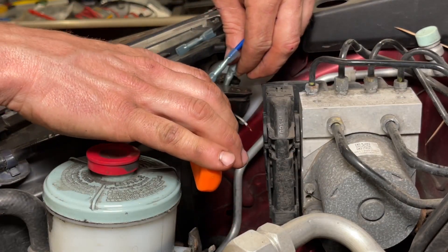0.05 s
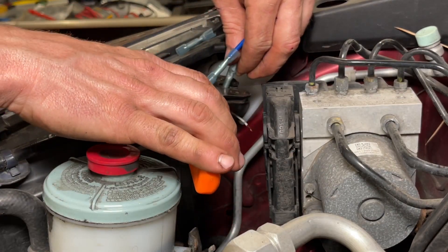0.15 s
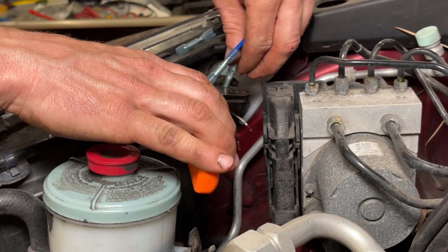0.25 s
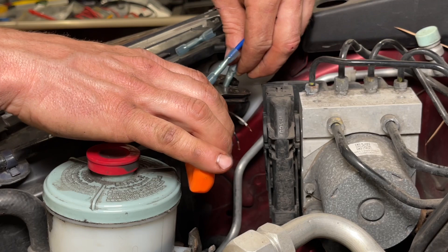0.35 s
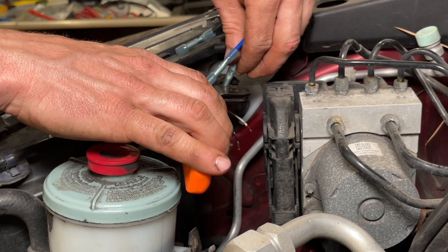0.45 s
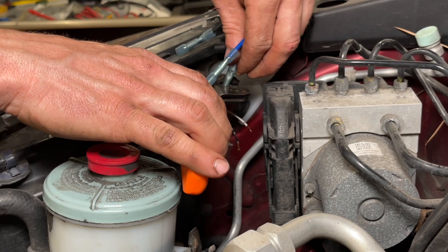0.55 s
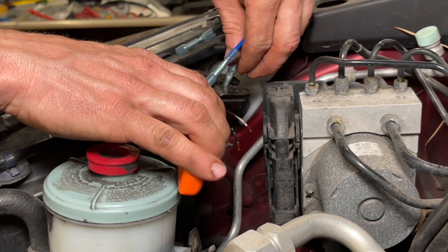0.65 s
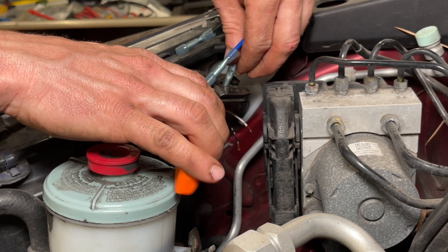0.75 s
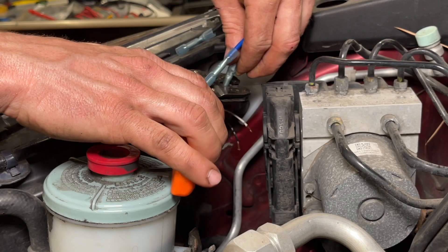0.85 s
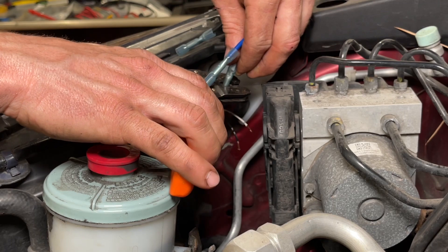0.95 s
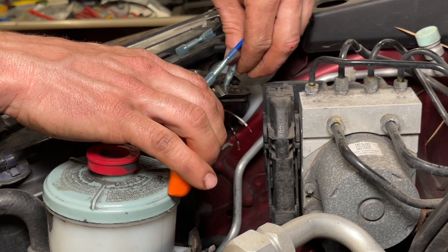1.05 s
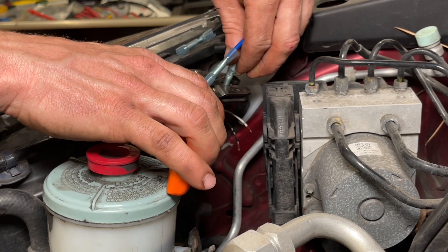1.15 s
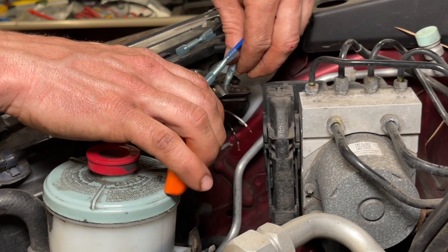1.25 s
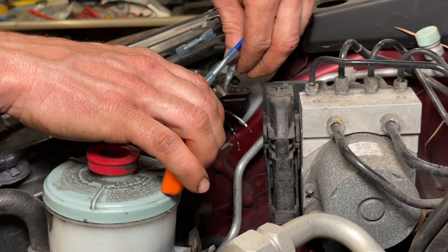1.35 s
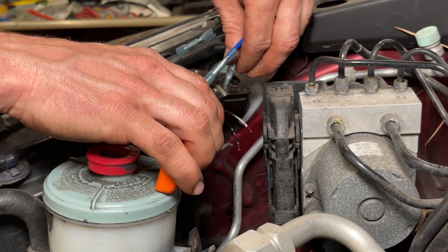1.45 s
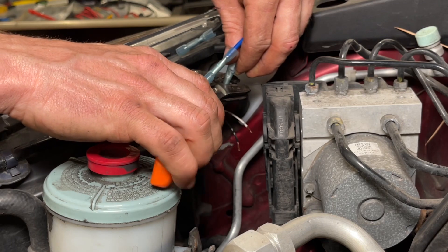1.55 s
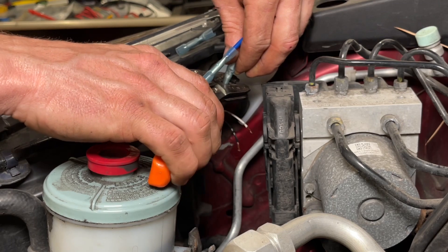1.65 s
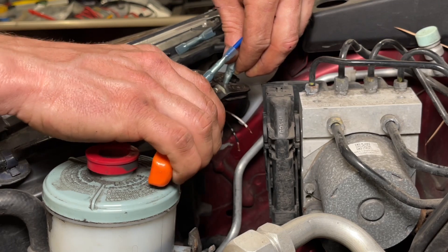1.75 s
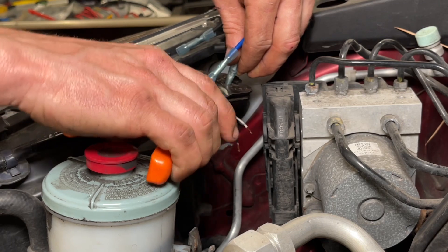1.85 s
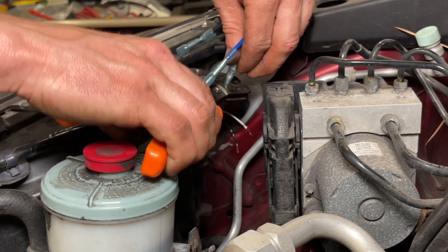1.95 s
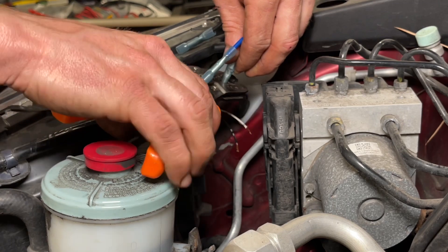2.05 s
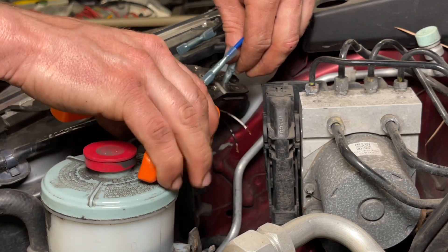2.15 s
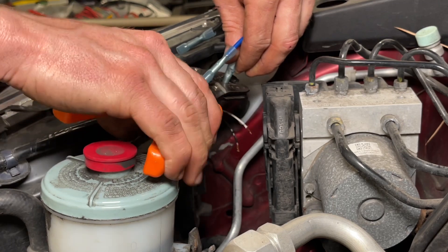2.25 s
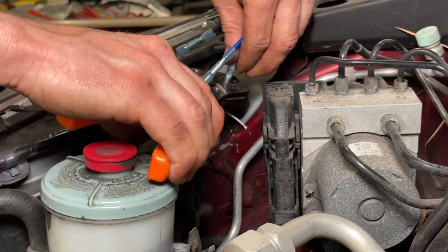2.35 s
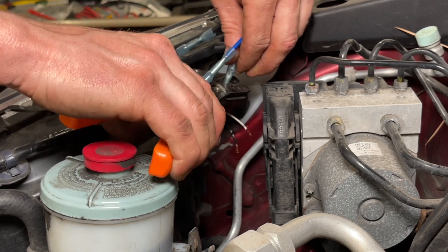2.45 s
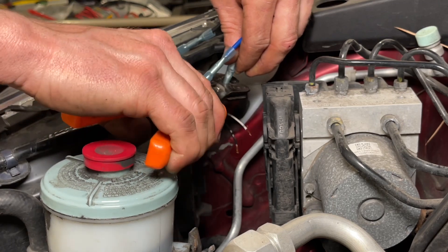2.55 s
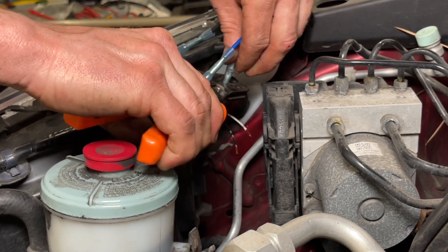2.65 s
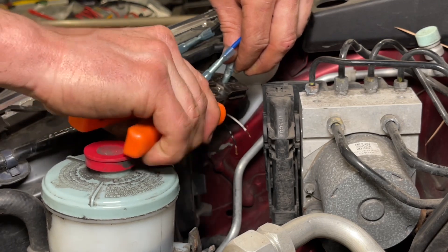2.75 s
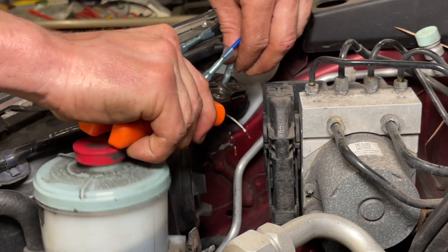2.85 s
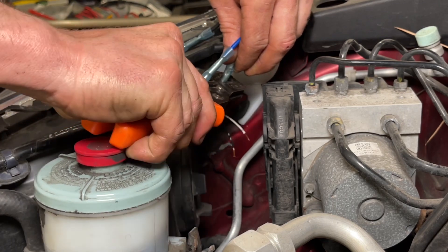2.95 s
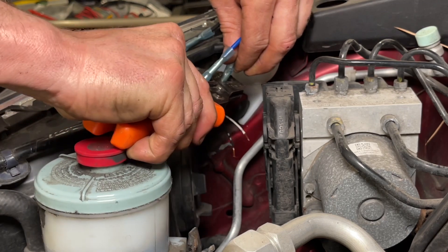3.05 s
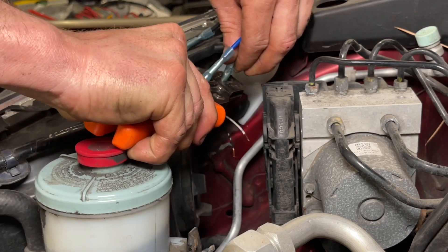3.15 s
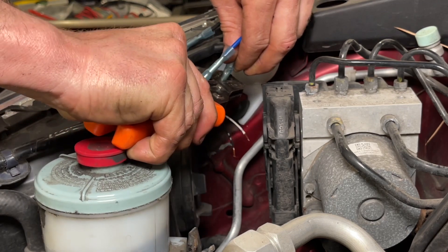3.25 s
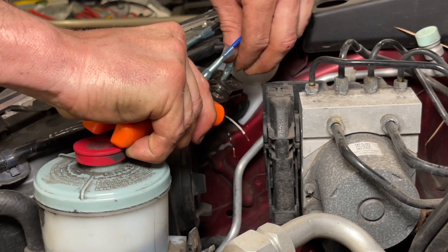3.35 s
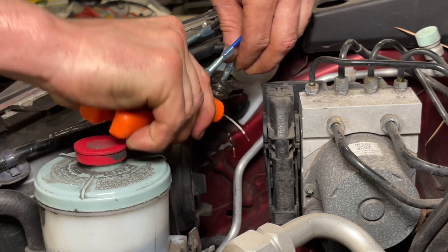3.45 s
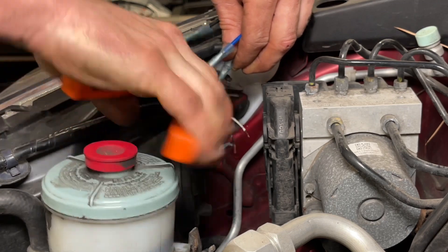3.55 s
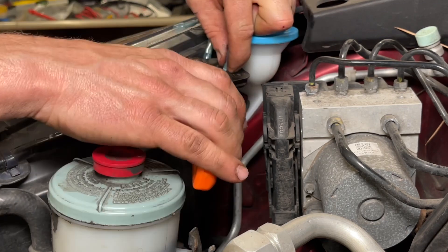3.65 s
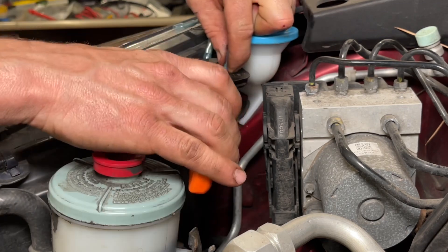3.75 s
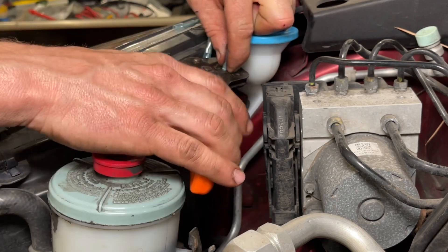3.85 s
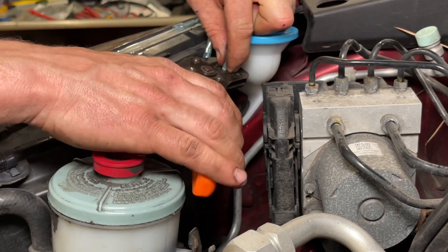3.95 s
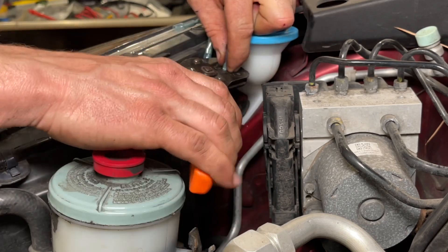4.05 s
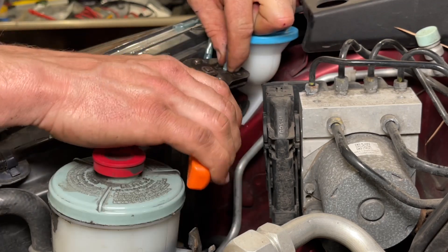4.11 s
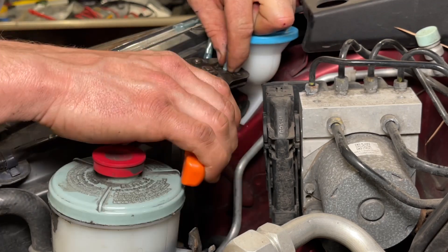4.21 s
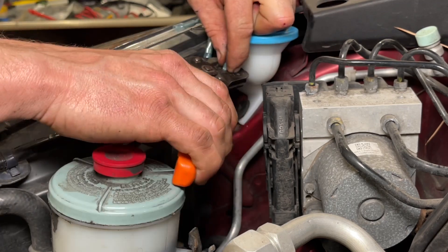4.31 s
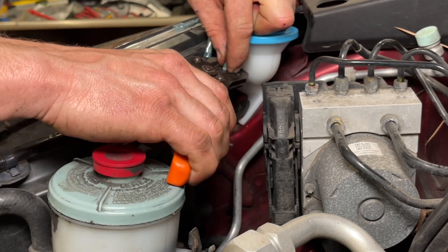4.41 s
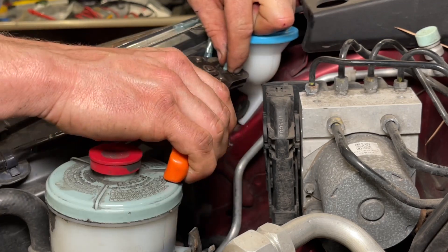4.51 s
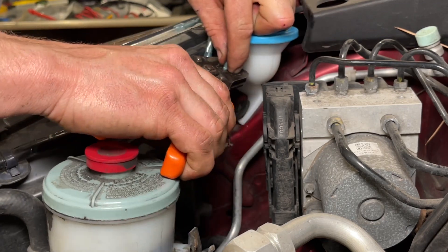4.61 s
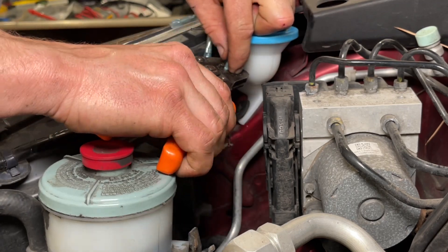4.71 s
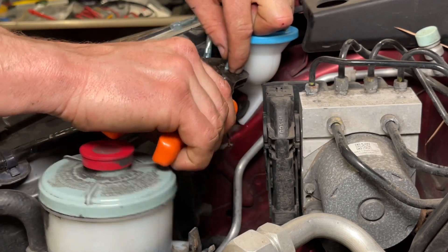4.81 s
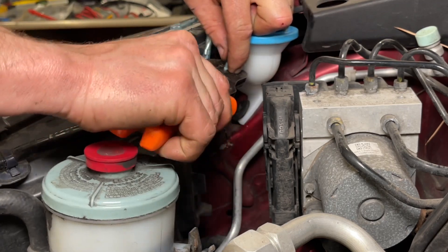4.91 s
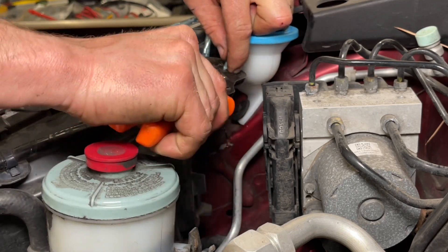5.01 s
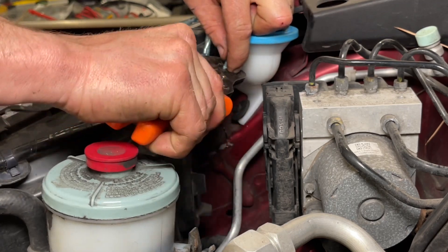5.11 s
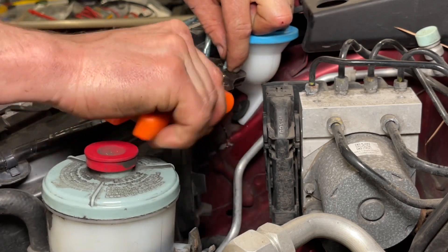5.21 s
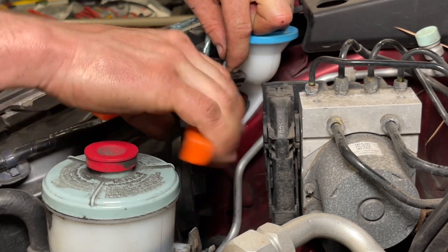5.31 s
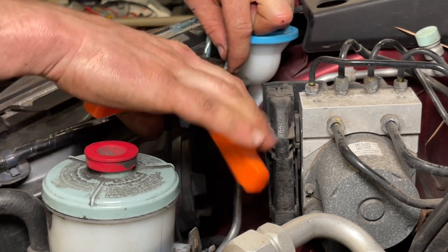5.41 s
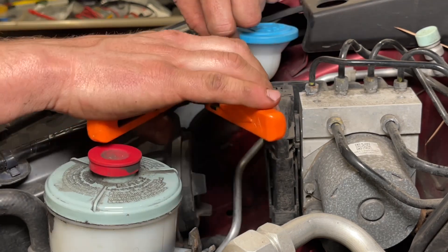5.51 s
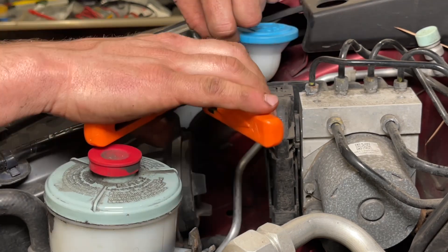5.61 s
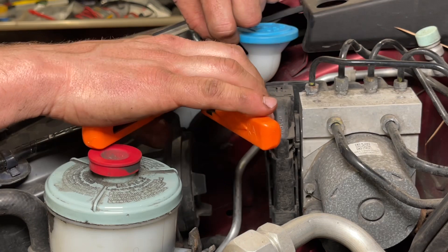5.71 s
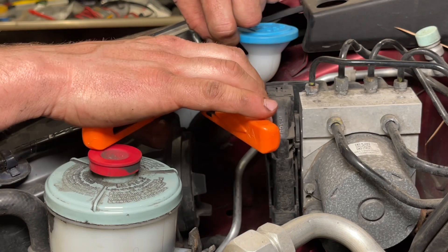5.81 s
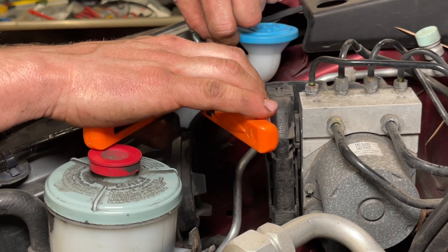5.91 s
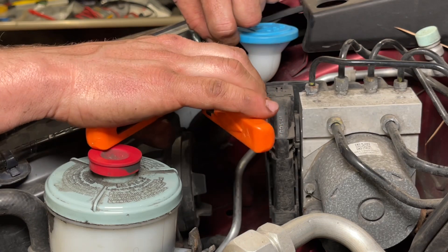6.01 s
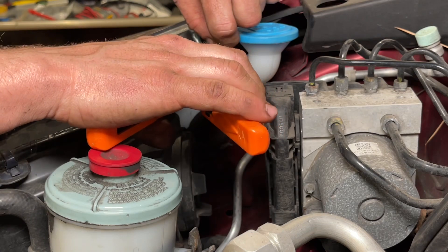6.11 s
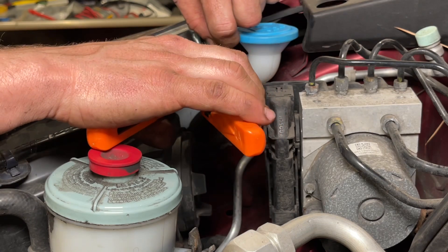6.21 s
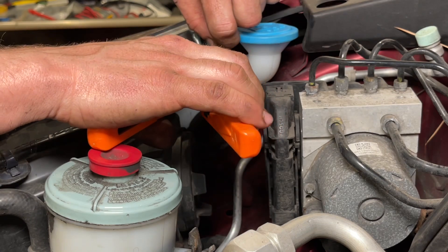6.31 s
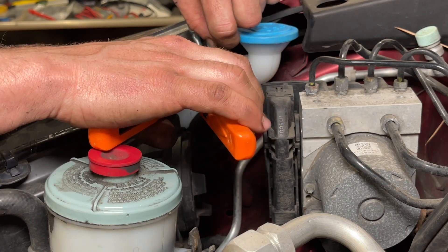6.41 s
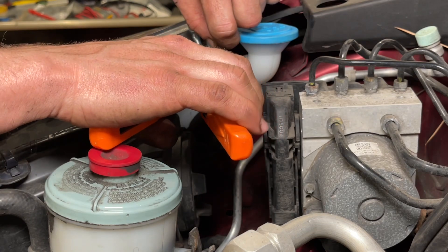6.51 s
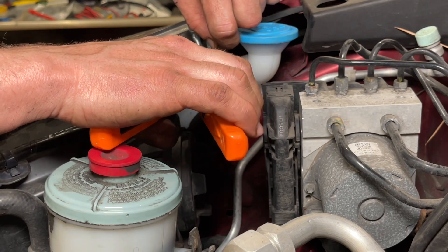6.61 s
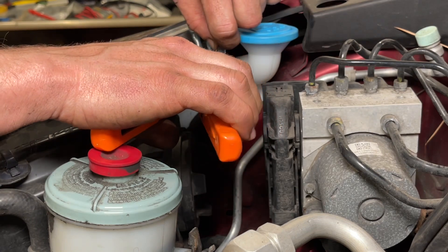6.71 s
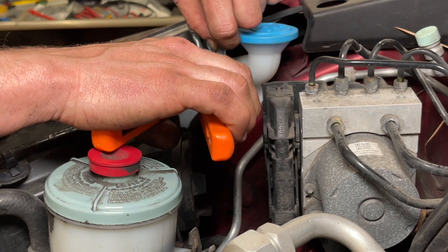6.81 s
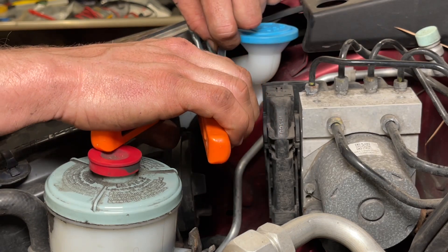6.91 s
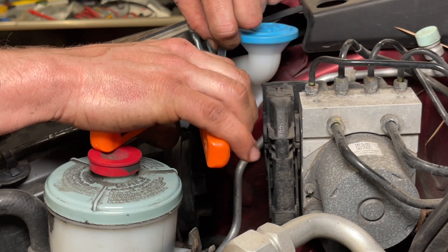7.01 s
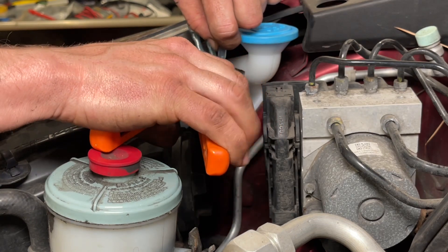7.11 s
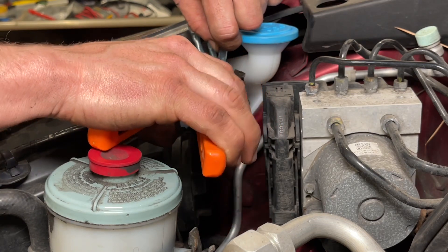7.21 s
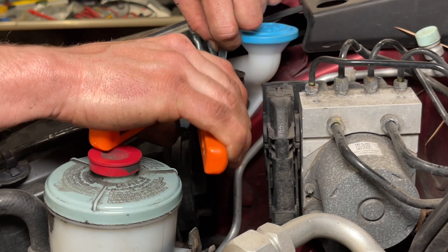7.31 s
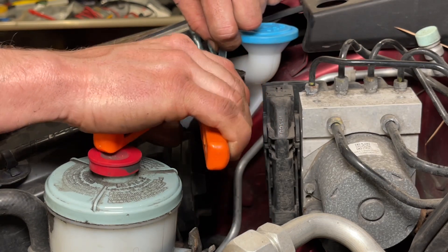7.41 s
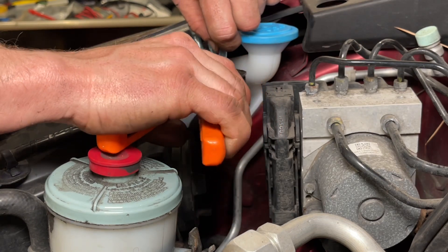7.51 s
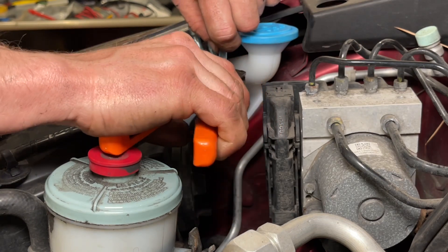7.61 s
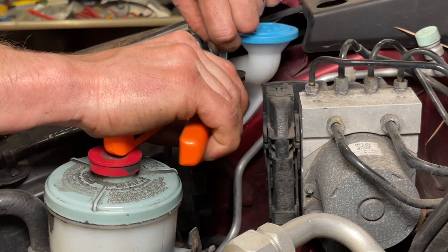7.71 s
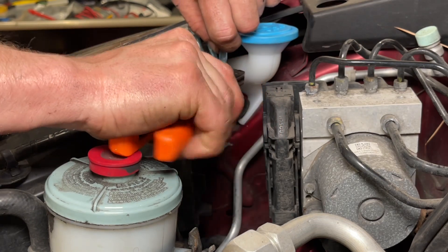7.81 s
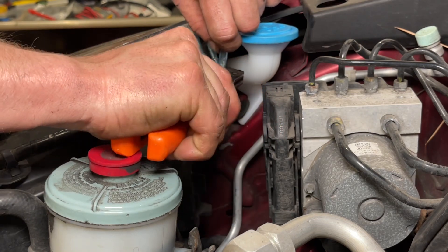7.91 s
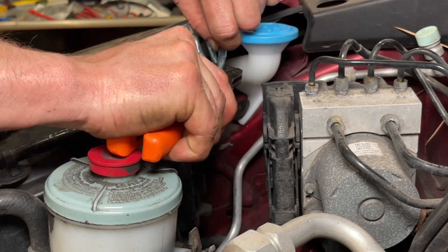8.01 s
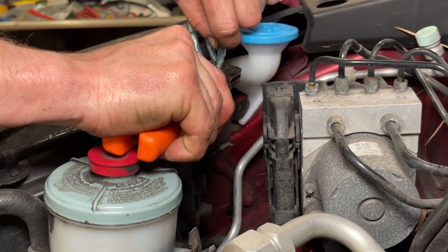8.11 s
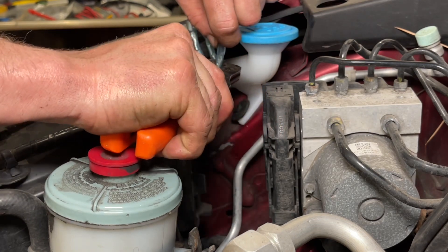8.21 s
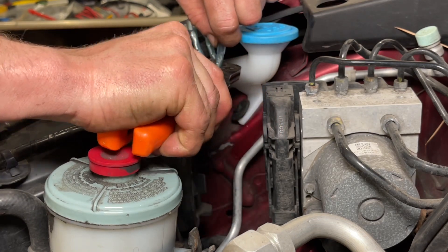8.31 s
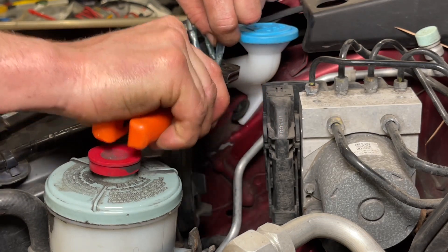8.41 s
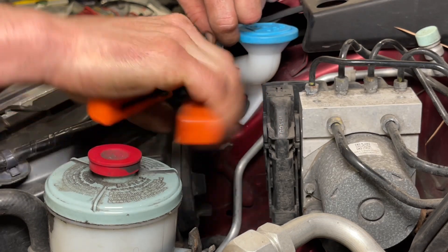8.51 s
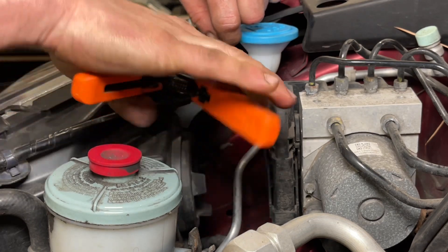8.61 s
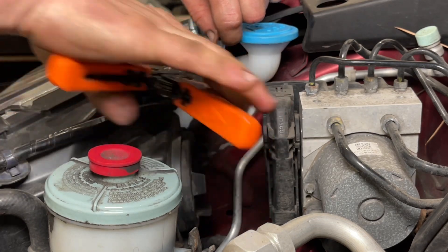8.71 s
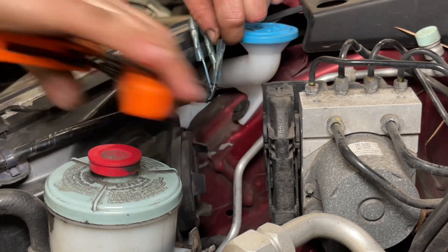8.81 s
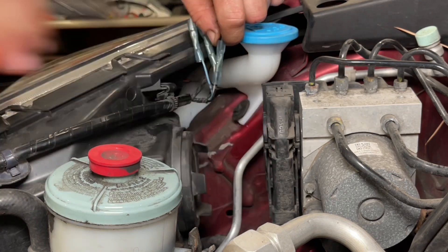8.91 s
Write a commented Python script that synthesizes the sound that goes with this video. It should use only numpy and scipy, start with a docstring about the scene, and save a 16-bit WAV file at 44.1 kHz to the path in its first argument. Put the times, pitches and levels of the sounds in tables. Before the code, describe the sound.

Close, bright steel ratchet clicks tighten to a jaw clunk, then the handles spring open with a quick zip, three times over faint ventilation rumble.

```python
"""Ratchet crimper in a quiet garage

A ratchet crimper closes on three wire connectors over a car's engine bay, close by.
Each time the pawl clicks over its teeth, the jaws clunk home, the handles bump, and the pawl rattles back.
Contacts are noise bursts and decaying modes, rubs are filtered slips; each has an echo of the garage.
Ventilation rumbles faintly throughout; the level dips briefly after each of the first two crimps.
"""
import sys
import numpy as np
from scipy import signal
from scipy.fft import rfft, irfft, next_fast_len
from scipy.io import wavfile
from scipy.ndimage import uniform_filter1d, map_coordinates

SR = 44100
rng = np.random.default_rng(int(sys.argv[2]) if len(sys.argv) > 2 else 0)


def master(y):
    """Save y as 16-bit WAV."""
    cut = np.clip(np.atleast_2d(y).T, -1, 1)
    pcm = np.round(cut * 32767)  # scale
    wavfile.write(sys.argv[1], SR, pcm.astype(np.int16))


N = 395047
T = np.arange(2 * SR // 5) / SR  # time inside one contact, in seconds

# The pawl drops into a tooth; the faintest rows are light clicks. Each row: time in seconds, treble level in
# dB, linkage ring in Hz.
PAWL_CLICKS = [(1.4055, -52, 3020), (1.5798, -45, 2980), (1.6022, -19, 2900), (2.2733, -58, 3030),
               (2.4852, -23, 2830), (2.5289, -33.5, 4670), (2.6083, -19, 2780), (2.6885, -35, 4580),
               (2.6951, -21, 4540), (2.7383, -19.5, 4610), (2.8205, -33, 2850), (4.2709, -20.5, 4740),
               (4.3262, -36, 4720), (4.462, -20, 3810), (4.516, -36, 5660), (4.6315, -24.5, 4830),
               (4.729, -25, 5050), (4.8676, -30, 2850), (4.8923, -21.5, 4580), (6.5601, -52, 3010),
               (6.813, -23.5, 4230), (7.4719, -21.5, 3000), (7.5304, -28.5, 5220), (7.5961, -20, 5480),
               (7.6167, -31, 4700), (7.679, -24, 4740), (7.7295, -24, 4440), (7.812, -34, 5380)]
# The pawl and its side plates. Each row: frequency in Hz, relative level in dB, t60 in seconds.
PAWL_MODES = [(1660, -8, 0.008), (1740, -9.5, .018), (2760, -8, .03), (4371, -4.5, 0.046),
              (8550, -1, 0.036), (8870, 4, 0.02), (9224, 5.5, 0.014), (11096, 8.5, .024)]
# Spectrum of the pawl's contact. Each row: frequency in Hz, density in dB per Hz.
PAWL_COLOUR = [(300, -30.5), (1000, -22), (1500, -10.5), (2300, -8.5), (3000, -4.5), (5000, -1),
               (7000, -4.5), (8800, -2), (9700, 3.5), (10300, -3.5), (11100, 2), (12400, -11), (13600, -31),
               (15200, -24)]
# The dies bite into the connector and load the frame. Each row: time in seconds, added body in dB.
BITES = [(1.6022, 3.7), (2.4852, 2.5), (4.8923, 8.5), (6.813, 7.5), (7.6167, 6), (7.812, 7)]
BITE_S = .012  # a bite's reach in time
# The jaws reach the end of each squeeze. Each entry: time in seconds.
JAWS_HOME = [2.8241, 4.8784, 7.8592]
# Body level of a click of usual treble; it grows more slowly than the treble, so hard clicks are brighter.
USUAL_TREBLE_DB, USUAL_BODY_DB, BODY_DB_PER_TREBLE_DB = -22, -32.8, .68
# The tightening grip damps the linkage: ring over the click with the jaws home, and gain per second before.
RING_HOME_DB, RING_DB_PER_S = -10.5, 3.5


def ratchet():
    """Impact excitation: the sprung pawl slips off a tooth, snaps into the next and rings the linkage."""
    out = np.zeros((2, N))
    for s, treble_db, hz in PAWL_CLICKS:
        bite_db = sum(db * np.exp(-((s - at) / BITE_S) ** 2) for at, db in BITES)
        body_db = USUAL_BODY_DB + BODY_DB_PER_TREBLE_DB * (treble_db - USUAL_TREBLE_DB) + bite_db
        home = JAWS_HOME[np.searchsorted(LEVEL_DIPS, s)]
        ring_db = RING_HOME_DB + RING_DB_PER_S * (home - s)
        slip = amp(body_db - 17.5) * crack(PAWL_COLOUR, rise=.0011, hold=.002, t60=.01)
        click = crack(PAWL_COLOUR, rise=.0004, hold=.0017, t60=.016)
        click = click + amp(-5.5) * ring(PAWL_MODES, detune=.0048)
        click = click + amp(ring_db) * ring([(hz, 0, .028)], detune=.0016)
        add(out, s - .002, slip, room_db=-14.5)
        add(out, s, voiced(click, body_db, treble_db), room_db=-13)
    return out


# Spectrum of the pawl's return contacts, also of the ticks. Each row: frequency in Hz, density in dB per Hz.
RELEASE_COLOUR = [(300, -20.5), (950, -22.5), (1500, -6), (2100, -2.5), (3300, 2.5), (4200, -2.5),
                  (5500, -1), (7200, -1), (8800, 0.5), (10300, 3), (11400, -0.5), (12600, -17),
                  (13700, -26.5), (15200, -27.5)]


def release():
    """Repeated impact: as the handles spring open, the pawl scrapes up each tooth's back and drops off it."""
    out = np.zeros((2, N))
    for s, body_db, treble_db, hz in skids():
        scrape = amp(body_db - 9.5) * crack(RELEASE_COLOUR, rise=.0011, hold=.0026, t60=.017)
        click = crack(RELEASE_COLOUR, rise=.0003, hold=.0015, t60=.021)
        click = click + amp(-7) * ring([(hz, 0, .03)], detune=.03)
        add(out, s - .0025, scrape, room_db=-16.5)
        add(out, s, voiced(click, body_db, treble_db), room_db=-14)
    return out


# The handles spring open over a run of teeth, then the last one. Each row: start in seconds, run length in
# seconds, slowing exponent, body level in dB, treble level in dB, lead of the unlatching in seconds,
# time of the last tooth in seconds, treble level of the last tooth in dB.
OPENINGS = [(3.551, .033, 1.13, -27.5, -24, .027, 3.6098, -53.5),
            (5.3206, .0766, 1.45, -29, -21.3, .019, 5.4275, -31),
            (8.5297, .0254, 1.2, -30.5, -24.5, .024, 8.5758, -29)]
TEETH = 5  # in the run, before the last one
END_RING_HZ, RUN_RING_HZ = 2900, 5600  # the linkage rings low at the first and last tooth
LAST_TOOTH_DB, UNLATCH_DB, UNLATCH_TREBLE_DB = -31.5, -49, -47


def skids():
    """Slowing motion: unlatching, ever wider tooth gaps, last tooth; (s, body dB, treble dB, ring Hz)."""
    for s, length, slowing, db, treble_db, ahead, last, last_treble_db in OPENINGS:
        yield s - ahead, UNLATCH_DB, UNLATCH_TREBLE_DB, RUN_RING_HZ
        for share in np.linspace(0, 1, TEETH):
            ring_hz = RUN_RING_HZ if share else END_RING_HZ
            yield s + length * share ** slowing, db, treble_db, ring_hz
        yield last, LAST_TOOTH_DB, last_treble_db, END_RING_HZ


# Faint long notes of the hardened steel. Each row: frequency in Hz, relative level in dB, t60 in seconds.
STEEL_MODES = [(2735, 0, .3), (3380, -2.5, .3), (4170, -3, .4), (5270, -2, .2), (5450, 1, .25),
               (6320, 1, .29), (7700, -3, .5), (8928, 7, .22), (9350, 1, .2)]


def voiced(click, body_db, treble_db):
    """Contact stiffness: the pawl bounces once, body and treble scale apart, and the steel sings on."""
    bounce = round(SR * rng.uniform(.0014, .0029))
    click = click + amp(-10.5) * np.pad(click, (bounce, 0))[:len(T)]
    treble = filtered(click, lambda hz: 1 - 1 / (1 + (hz / 6500) ** 12))
    body = click - treble
    sing = amp(body_db - 23.5) * ring(STEEL_MODES, detune=.00091, blur_hz=18)
    return amp(body_db) * struck(body) + amp(treble_db) * struck(treble) + sing


# The jaws close under load. Each row: time in seconds, level in dB, frame ring over the crack in dB.
JAW_CLUNKS = [(2.8241, -22.5, -1), (2.8508, -34, -12), (4.8784, -20.5, -1), (4.9087, -36, -6),
              (7.2114, -35, 2), (7.841, -36.5, -10), (7.8592, -29, -1)]
# The loaded steel frame. Each row: frequency in Hz, relative level in dB, t60 in seconds.
FRAME_MODES = [(680, -4.5, .018), (1078, .5, .036), (1205, 1.5, .06), (1218, -23, .45), (1630, -7, .022),
               (2820, 5.5, .024), (3634, -3.5, .016), (4460, -2.5, .027), (2730, -33, .32),
               (4300, -34, .45)]
# Spectrum of the jaws' contact. Each row: frequency in Hz, density in dB per Hz.
JAW_COLOUR = [(100, -13.5), (400, -6), (700, -1), (2200, -4.5), (3500, 1.5), (7000, -6), (9500, -7),
              (12000, -20), (13500, -39), (16000, -51.5)]


def jaws():
    """Modal excitation: the dies scrape home, the loaded frame clunks and a few modes sing on."""
    out = np.zeros((2, N))
    for s, db, ring_db in JAW_CLUNKS:
        scrape = amp(db - 18) * crack(JAW_COLOUR, rise=.001, hold=.002, t60=.01)
        clunk = crack(JAW_COLOUR, rise=.00067, hold=.0018, t60=.019)
        clunk = clunk + amp(ring_db) * ring(FRAME_MODES, detune=.003, blur_hz=3)
        add(out, s - .003, scrape, room_db=-17.5)
        add(out, s, amp(db) * struck(clunk), room_db=-18.5, size=60)
    return out


# Dull bumps of hand and plastic handles. Each row: time in seconds, level in dB, pitch in Hz.
HANDLE_BUMPS = [(2.158, -54, 210), (2.852, -39, 441), (2.868, -39, 302), (2.906, -48, 540),
                (3.53, -43, 185), (4.895, -47, 190), (4.914, -45, 377), (7.6167, -30.5, 535),
                (7.842, -42, 450), (8.55, -44.5, 366)]
# Spectrum of a bump. Each row: multiple of its pitch, density in dB per Hz.
BUMP_COLOUR = [(.15, -23), (.4, -12), (.7, -2.5), (1, 2), (1.35, -10), (2.1, -19.5), (6, -34.5),
               (18, -56.5)]
# The handles give just before the jaws are home. One row: lead in seconds, level in dB, pitch in Hz.
HANDLES_GIVE = (.032, -48, 548)


def bumps():
    """Soft-contact impact: compliant handles give a short low knock whose colour follows its pitch."""
    out = np.zeros((2, N))
    ahead, give_db, give_hz = HANDLES_GIVE
    giving = [(home - ahead, give_db, give_hz) for home in JAWS_HOME]
    for s, db, hz in [*HANDLE_BUMPS, *giving]:
        colour = [(multiple * hz, level) for multiple, level in BUMP_COLOUR]
        knock = crack(colour, rise=.001, hold=.0029, t60=.028)
        knock = knock + amp(1) * ring([(hz, 0, .055), (.76 * hz, -3, .028)], detune=.007)
        add(out, s, amp(db) * struck(knock, size=440), room_db=-14, size=24)
    return out


# Light ticks of the linkage. Each row: time in seconds, level in dB.
LINKAGE_TICKS = [(.904, -73.5), (2.259, -62), (2.4324, -70), (3.5399, -41), (5.4114, -39), (6.8031, -49),
                 (7.118, -71.5)]


def ticks():
    """Mechanical clearance: play in the pins gives small, thin ticks."""
    out = np.zeros((2, N))
    for s, db in [*LINKAGE_TICKS, *play()]:
        tick = amp(db) * crack(RELEASE_COLOUR, rise=.0006, hold=.002, t60=.045)
        add(out, s, tick, room_db=-8.5)
    return out


# The connector settles in the dies in even steps. One row: first step in seconds, gap in seconds, level in dB.
CREEP = (1.823, .118, -69.5)
# After a pause the slack is taken up with a tick just ahead of the click, relative to the click's treble.
PAUSE_S, TAKE_UP_S, TAKE_UP_DB = .15, .018, -43
# A tick as the grip eases, twice as far ahead as the unlatching, and one as the pawl lifts.
EASE_DB, LIFT_S, LIFT_DB = -56, .0044, -36


def play(count=4):
    """Taking up of slack: pins tick in creep, ahead of a click after a pause and of an opening; (s, dB)."""
    first, gap, creep_db = CREEP
    yield from ((first + k * gap, creep_db) for k in range(count))
    for (before, _, _), (s, treble_db, _) in zip(PAWL_CLICKS, PAWL_CLICKS[1:]):
        if s - before > PAUSE_S:
            yield s - TAKE_UP_S, treble_db + TAKE_UP_DB
    for s, _, _, _, _, ahead, _, _ in OPENINGS:
        yield s - 2 * ahead, EASE_DB
        yield s - LIFT_S, LIFT_DB


# The dies slide on the connector and the pivots rub under load. Each row: start in seconds, length in seconds,
# level in dB before the swell, centre in Hz.
LOADED_RUBS = [(1.405, .11, -66, 5800), (2.817, 0.04, -45, 1250), (2.829, 0.028, -45.5, 4140),
               (3.44, .07, -73.5, 4000), (4.215, 0.06, -76, 4200), (4.668, 0.04, -60, 900),
               (5.234, 0.065, -59, 850), (5.228, .08, -75, 6500), (6.56, .1, -70, 5800),
               (7.828, 0.042, -46, 2610)]
# The hand settles on the grips. One row: delay after the jaws are home in seconds, then as in a rub.
HAND_SETTLES = (.016, .13, -53, 215)
# The grips slide in the opening hand. One row: delay after the opening in seconds, then as in a rub.
GRIPS_SLIDE = (.025, .22, -56.5, 340)


def rubs():
    """Friction: tiny slips of uneven size swell quickly and fade slower through one broad resonance."""
    out = np.zeros((2, N))
    settling = [(home + HAND_SETTLES[0], *HAND_SETTLES[1:]) for home in JAWS_HOME]
    sliding = [(s + GRIPS_SLIDE[0], *GRIPS_SLIDE[1:]) for s, *_ in OPENINGS]
    for s, length, db, hz in [*LOADED_RUBS, *settling, *sliding]:
        stroke = np.sin(np.pi * np.clip(T / length, 0, 1) ** .65) ** 1.3
        slips = rng.standard_normal(len(T)) * amp(7.6 * rng.standard_normal(len(T)))
        band = [hz / 1.7, min(hz * 1.45, SR / 2.1)]
        body = signal.lfilter(*signal.butter(2, band, "band", fs=SR), slips)
        add(out, s, amp(db) * stroke * unit(body), room_db=-10, size=24)
    return out


# A faint thin whine. Each row: time in seconds, mean pitch in Hz, level in dB.
WHINE_PATH = [(5.8, 1492, -100), (6.25, 1483, -84.5), (6.55, 1490, -80), (6.78, 1560, -79),
              (6.9, 1530, -110)]


def whine():
    """Frequency modulation: a weak unsteady tone swells while the third connector is lined up."""
    s, hz, db = np.transpose(WHINE_PATH)
    t = np.arange(N) / SR
    unsteadiness = 26 * map_coordinates(rng.standard_normal(1000), [t * 100])
    pitch = np.interp(t, s, hz) + unsteadiness
    tone = unit(np.sin(2 * np.pi * np.cumsum(pitch) / SR))
    return amp(np.interp(t, s, db, left=-140, right=-140)) * tone


# Spectrum of the garage air. Each row: frequency in Hz, density in dB per Hz.
AIR_COLOUR = [(20, -44), (30, -29), (42, -7.5), (60, -3.5), (100, -7), (165, -12.5), (220, -18), (340, -20),
              (400, -25.5), (520, -23), (620, -29.5), (1400, -40), (2900, -50.5), (4200, -58), (9000, -58),
              (10300, -63), (11500, -64), (14000, -74)]
AIR_DB = -55.06  # before the swell and the lean
# Faint machine hum. Each row: frequency in Hz, level in dB before waver, swell and lean.
HUM_TONES = [(64.6, -62.5), (119, -67), (156, -67)]
# Swell of the rumble. Each row: time in seconds, gain in dB.
RUMBLE_SWELL = [(0, -1), (4.6, 0), (6.2, 2), (8.9, .5)]


def ventilation():
    """Broadband flow noise: low rush with wavering hum, a little to the right; only the rumble swells."""
    air = unit(filtered(diffuse(rng.standard_normal((2, N))), lambda hz: amp(along(AIR_COLOUR, hz))))
    t = np.arange(N) / SR
    waver = lambda: map_coordinates(rng.standard_normal(64), [t * 5])
    hum = sum(amp(db + 2 * waver()) * unit(np.sin(2 * np.pi * hz * t + .53 * waver()))
              for hz, db in HUM_TONES)
    floor = amp(AIR_DB) * air + hum
    rumble = filtered(floor, lambda hz: 1 / (1 + (hz / 300) ** 4))
    floor = floor - rumble + rumble * amp(np.interp(t, *np.transpose(RUMBLE_SWELL)))
    lean_db = [(60, -2.4), (200, -3), (1000, -.3)]  # (Hz, left over right in dB)
    return filtered(floor, lambda hz: amp(np.outer([.5, -.5], along(lean_db, hz))))


# Brief dips in level, which also cut off the echoes. Each entry: time in seconds.
LEVEL_DIPS = [3.622, 5.55]


def add(out, s, sound, room_db, size=120):
    """Superposition: direct contact plus its reverberant echo, cut off at the next level dip."""
    tail = garage()
    # the walls hear the tool from every side, which evens out its fine peaks and dips
    power = uniform_filter1d(abs(rfft(sound, 8192)) ** 2, size=size)
    spectrum = np.sqrt(abs(power))
    bins_hz = np.fft.rfftfreq(8192, 1 / SR)
    heard = amp(room_db) * filtered(tail, lambda hz: np.interp(hz, bins_hz, spectrum))
    heard[:, :len(sound)] += sound
    start = round(s * SR)
    cuts = [round(dip * SR) for dip in LEVEL_DIPS if dip > s]
    end = min(cuts + [N, start + heard.shape[1]])
    out[:, start:end] += heard[:, :end - start]


# The garage's decay. Each row: frequency in Hz, t60 in seconds.
GARAGE_T60 = [(200, 0.52), (1200, 0.5), (4000, 0.5247), (6000, 0.47), (9000, 0.4241), (11500, 0.26),
              (14000, 0.25)]
# The garage's colour. Each row: frequency in Hz, relative level in dB.
GARAGE_COLOUR = [(200, 2), (1200, 7.5), (2200, 1.5), (4000, -1), (6000, 0), (8500, 0), (13000, -4)]


def garage():
    """Reverberation: a fresh room answer of quick scatter from the engine bay, then the walls."""
    hz, t, z = signal.stft(rng.standard_normal((2, SR // 2)), SR, nperseg=256)
    decay_db = along(GARAGE_COLOUR, hz)[:, None] - 60 * t / along(GARAGE_T60, hz)[:, None]
    tail = diffuse(signal.istft(z * amp(decay_db), SR, nperseg=256)[1])
    t = np.arange(tail.shape[1]) / SR
    tail *= np.clip(t / .0074, 0, 1) * (1 + 3.1 * np.exp(-t / .0096))
    return tail / np.linalg.norm(tail[0])


# Left-right likeness of diffuse sound. Each row: frequency in Hz, coherence.
COHERENCE = [(60, .96), (200, .92), (500, .7), (1300, .45), (3200, .8), (7000, .6), (12000, .4)]


def diffuse(pair):
    """Interchannel coherence: two unrelated noises become a partly alike left and right."""
    turn = lambda hz: np.arccos(np.clip(along(COHERENCE, hz), -1, 1)) / 2
    mid, side = filtered(pair, lambda hz: np.array([np.cos(turn(hz)), np.sin(turn(hz))]))
    return np.array([mid + side, mid - side])


def crack(colour, rise, hold, t60):
    """High modal density: coloured noise stands for short-lived modes that build up, chatter and die."""
    envelope = (1 - np.exp(-T / rise)) * amp(-60 * np.maximum(T - hold, 0) / t60)
    chatter = rng.standard_normal(len(T)) * envelope
    return struck(signal.fftconvolve(chatter, causal(colour))[:len(T)])


def ring(modes, detune, blur_hz=0):
    """Modal decay: the grip shifts pitch and strength at every blow; loose joints blur the phase."""
    hz, db, t60 = np.transpose(modes)[:, :, None]
    shift, strength, phase = rng.standard_normal((3, len(modes), 1))  # phase in cycles
    if blur_hz:
        steps = rng.standard_normal((len(modes), len(T)))
        phase = phase + np.cumsum(steps, axis=1) * np.sqrt(blur_hz / SR / (2 * np.pi))
    waves = np.sin(2 * np.pi * (hz * (1 + detune * shift) * T + phase))
    decay = amp(db + 2 * strength - 60 * T / t60)
    onset = 1 - np.exp(-T / .00035)
    return struck(np.sum(decay * waves, axis=0) * onset)


def causal(colour, size=1024):
    """Minimum phase: the folded cepstrum turns a colour into an impulse response."""
    cepstrum = irfft(np.log(amp(along(colour, np.fft.rfftfreq(size, 1 / SR)))))
    cepstrum[1:size // 2] *= 2
    cepstrum[size // 2 + 1:] = 0
    return irfft(np.exp(rfft(cepstrum)))


def filtered(x, response):
    """Linear filtering: the spectrum of x times a response of frequency."""
    n = x.shape[-1]
    m = next_fast_len(n + 4096)
    return irfft(rfft(x, m) * response(np.fft.rfftfreq(m, 1 / SR)), m)[..., :n]


def along(points, hz):
    """Logarithmic frequency scale: (Hz, value) points interpolated on a log axis."""
    f, v = np.transpose(points)
    return np.interp(np.log(hz + 1), np.log(f), v)


def struck(x, size=220):
    """Onset level: x scaled to rms 1 over its first samples."""
    return x / np.sqrt(np.mean(x[:size] ** 2) + 1e-20)


def unit(x):
    """Root mean square: x scaled to rms 1."""
    return x / np.sqrt(np.mean(x ** 2) + 1e-20)


def amp(db):
    """Decibel scale: level to gain."""
    return 10 ** (np.asarray(db) / 20)


def scene():
    """Superposition: the tool over the room's floor."""
    tool = ratchet() + release() + jaws() + bumps() + ticks() + rubs()
    return tool + whine() + ventilation()


# Phase difference between the channels. Each row: frequency in Hz, left lead in radians.
LEFT_LEAD = [(200, .02), (1200, .65), (1600, -.1), (2200, -.1), (3400, .65), (4900, .5), (7000, 0),
             (7800, .5), (8600, -.3), (9400, -1.9), (10300, -3.1), (11300, -4.4), (12200, -6),
             (15500, -12.4)]
TOP_HZ = 16600  # upper band limit


def record(dry):
    """Phase and band limiting: brief level dips, a left-right phase difference and a steep low-pass."""
    t = np.arange(N) / SR
    dips = [np.interp(t - dip, [-.036, -.003, .014], [1, .1, 1]) for dip in LEVEL_DIPS]
    dipped = dry * np.prod(dips, axis=0)
    stereo = filtered(dipped, lambda hz: np.exp(1j * np.outer([.5, -.5], along(LEFT_LEAD, hz))))
    return filtered(stereo, lambda hz: 1 / (1 + (hz / TOP_HZ) ** 120))


dry = scene()
out = record(dry)
master(out)
```